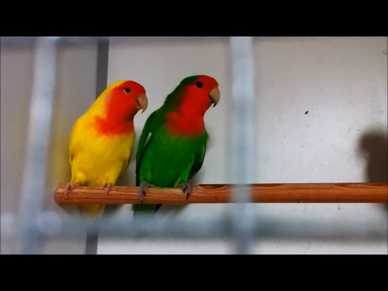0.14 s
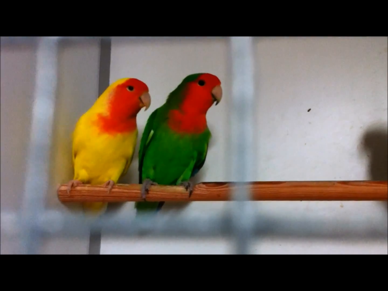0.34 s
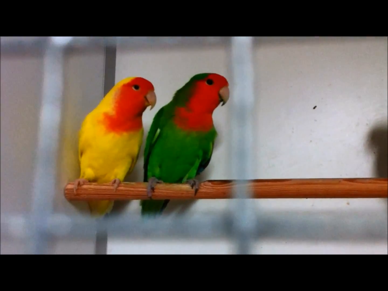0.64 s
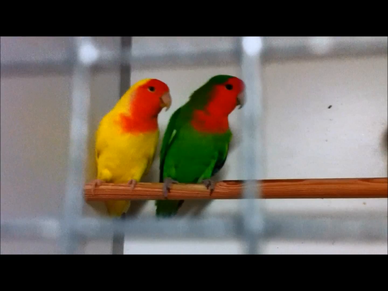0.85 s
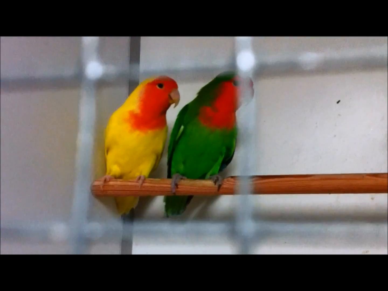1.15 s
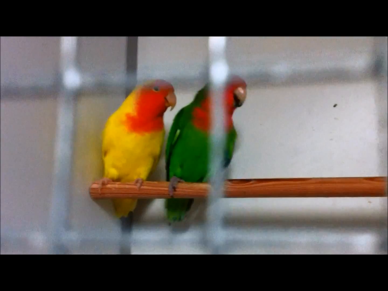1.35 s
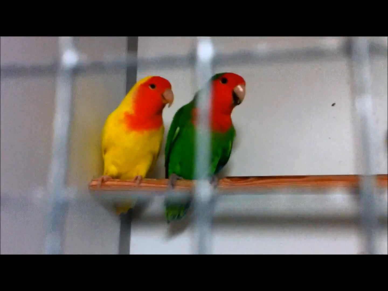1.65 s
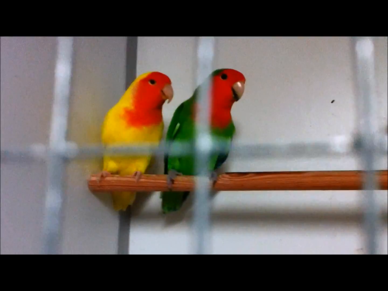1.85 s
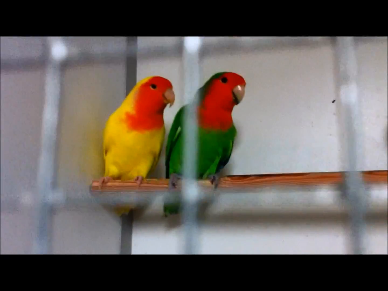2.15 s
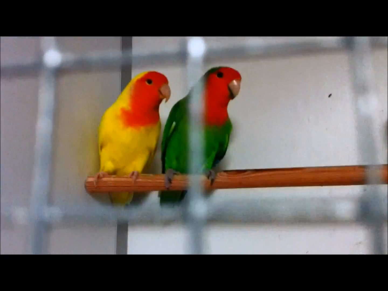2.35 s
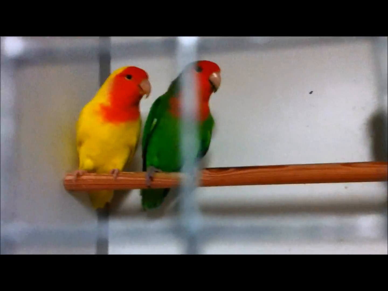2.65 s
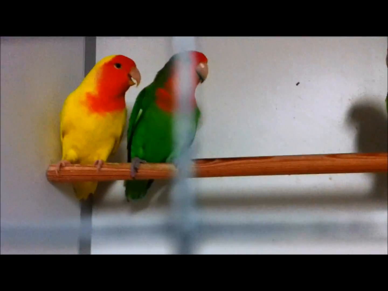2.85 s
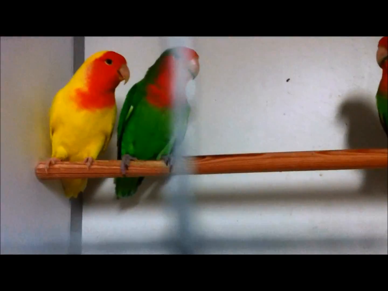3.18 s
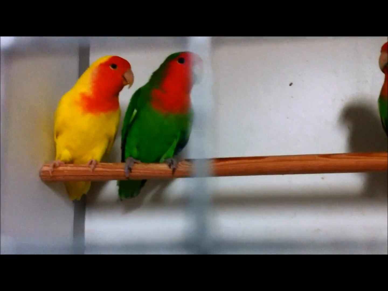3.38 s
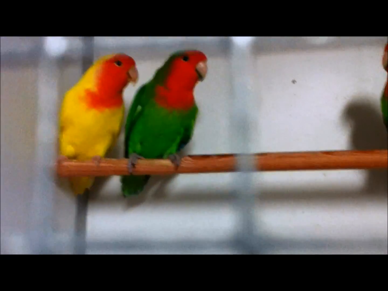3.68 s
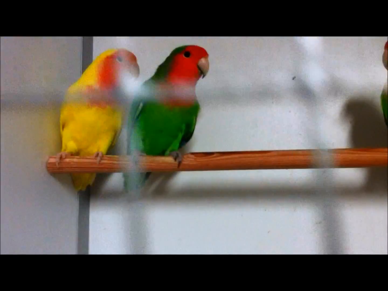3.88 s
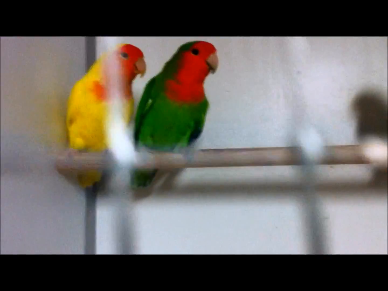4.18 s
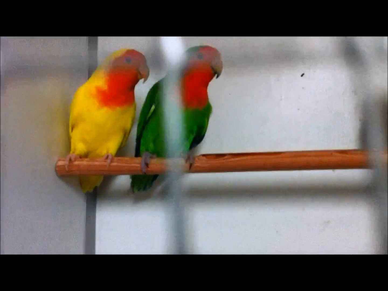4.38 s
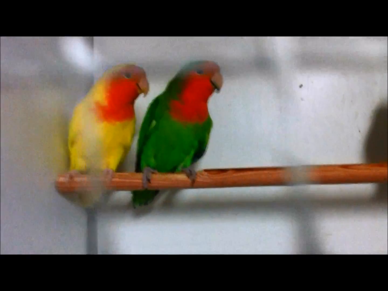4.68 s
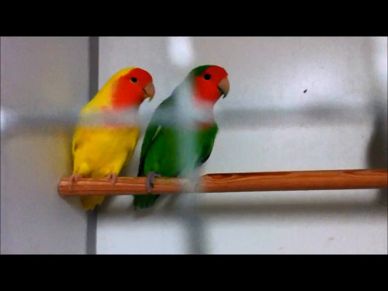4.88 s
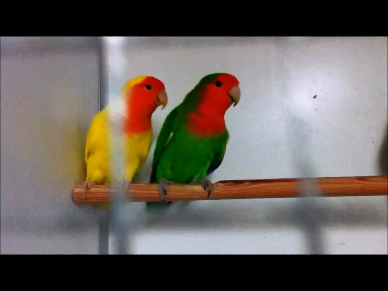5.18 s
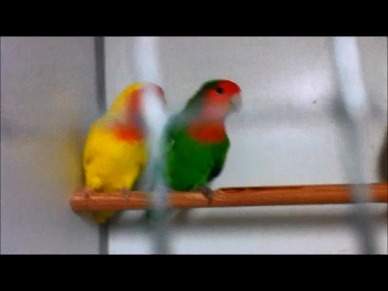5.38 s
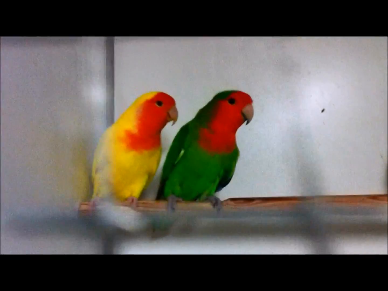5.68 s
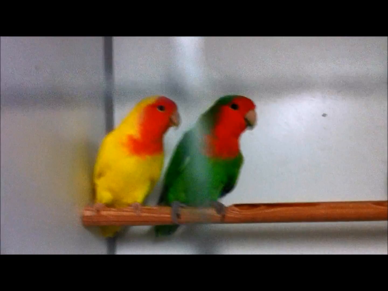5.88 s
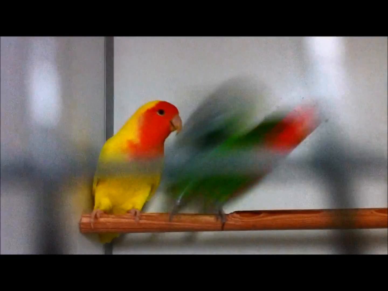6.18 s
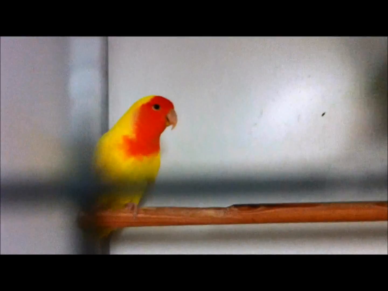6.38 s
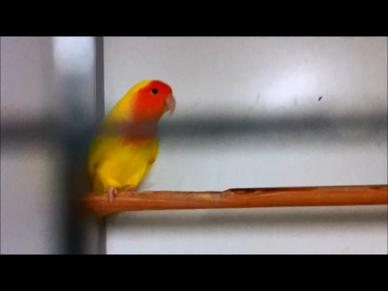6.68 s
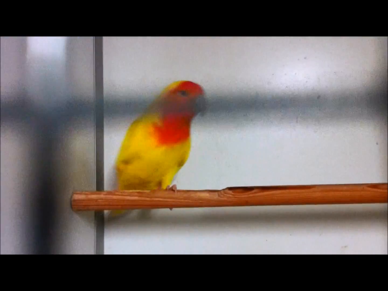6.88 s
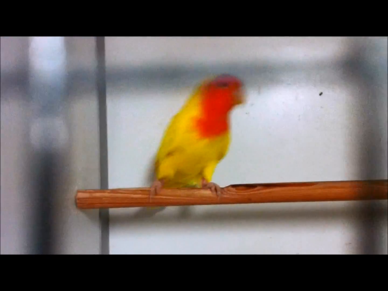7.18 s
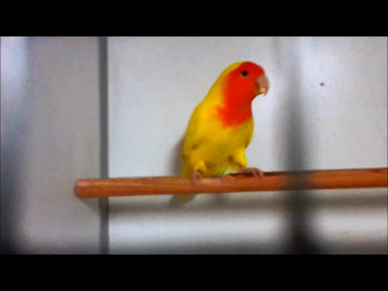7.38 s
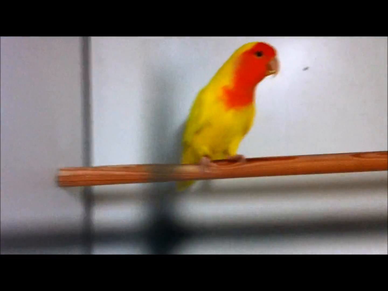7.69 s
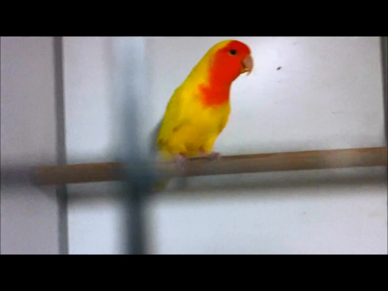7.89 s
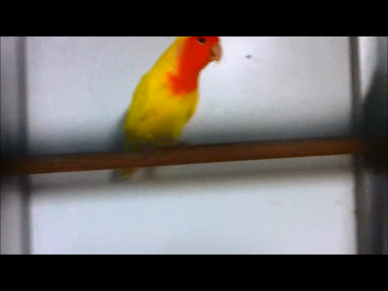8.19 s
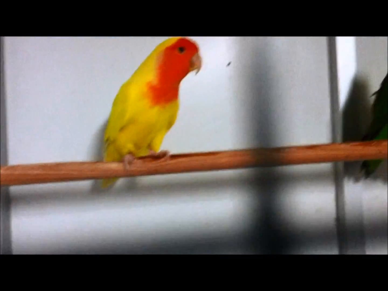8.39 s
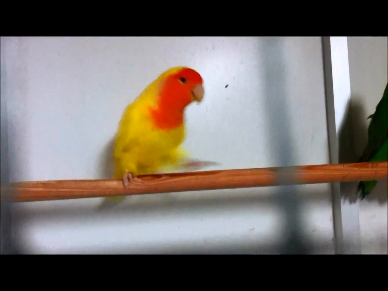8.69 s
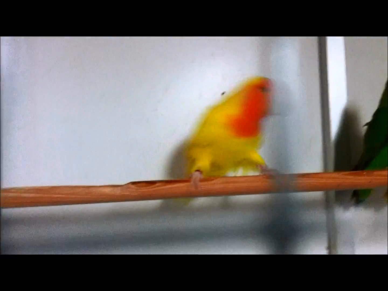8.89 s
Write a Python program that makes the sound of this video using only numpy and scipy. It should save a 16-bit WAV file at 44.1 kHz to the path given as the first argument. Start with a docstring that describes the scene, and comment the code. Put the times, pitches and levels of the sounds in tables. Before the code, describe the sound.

In a small, reflective indoor room, quiet murmur, thin hiss, a faint low hum and handling rumble surround caged lovebirds. The first second is nearly calm, with faint rustles and a tiny chip at 1.1. From 1.3 to 2.0, short shrill shrieks alternate between harsh rasp and clear rising whistle. A small close knock comes at 2.3, amid spaced rasping cries until 3.3, with a rattling scold around 3.0. Brief gliding shrieks follow to 3.9, then a louder, tighter burst from 4.4 to 4.9 ends in piercing whistles. Between 5.45 and 6.6, quick chips repeat about ten times a second; soft wing puffs flutter from 6.25 to 6.7. Strong shrieks and whistles ring at 6.7-6.9. Another rattling scold comes at 7.5, weak chips until 8.0, near quiet, then a bright high whistle at 8.95-9.05.

```python
"""Lovebirds in a small hard-walled room

Shrieks glide and break between clear whistle and harsh rasp, among rattling scolds and runs of short chips.
The calls come from a vibrating-membrane model: a harmonic series that smears and gives way to chaotic noise.
Scolds are pulse trains through beak resonances; wing beats are puffs of air; knocks are damped noise bursts.
Wall reflections and a decaying tail surround them, over murmur, hiss, handling rumble and a faint drone."""
import sys
import numpy as np
from scipy import signal
from scipy.fft import rfft, irfft, next_fast_len
from scipy.io import wavfile
from scipy.ndimage import uniform_filter1d, minimum_filter1d, map_coordinates

SR = 44100
rng = np.random.default_rng(int(sys.argv[2]) if len(sys.argv) > 2 else 0)


def dump_mix(stems):
    """Bounce the given channels to the path in sys.argv[1] as a 16-bit WAV at rate SR."""
    frames = np.atleast_2d(stems).T  # one column per channel
    limited = np.clip(frames, -1, 1)  # hard clip at full scale
    pcm = np.round(limited * 32767).astype(np.int16)
    wavfile.write(sys.argv[1], SR, pcm)


N = 398663
TIME = np.arange(N) / SR
CUTOFF_HZ = 15800

# Throat and beak filter of the clear voice in all shrieks and whistles: (frequency [Hz], gain [dB])
SHRIEK_THROAT = [(1600, -12), (2400, -11), (4000, 1.5), (5000, 2.5), (6500, -1), (7600, -8.5),
                 (9200, -10.5), (12500, -17.5), (15500, -37.5)]
SCOOP_S = 0.0065   # time constant of the onset of a gliding shriek


def from_db(db):
    """Level definition: an amplitude ratio is ten to the power dB / 20."""
    return 10 ** (np.asarray(db) / 20)


def rms_one(x):
    """Normalization of mean power to one."""
    return x / np.sqrt(np.mean(x ** 2) + 1e-20)


def at_hz(points, hz):
    """Interpolation of a spectrum on a logarithmic frequency axis."""
    points = np.array(points)
    return np.interp(np.log(np.maximum(hz, 1)), np.log(points[:, 0]), points[:, 1])


def in_time(rows):
    """Linear interpolation of a curve's columns at every sample."""
    s, *columns = np.transpose(rows)
    return [np.interp(TIME, s, column) for column in columns]


def controls(rows):
    """Linear interpolation of one call's columns from its first time to its last."""
    s, *columns = np.transpose(rows)
    s = np.sort(s)
    t = np.arange(s[0], s[-1] + 1 / SR, 1 / SR)
    return [np.interp(t, s, column) for column in columns]


def course(length_s):
    """Normalized time: seconds into a call, and progress through it from 0 to 1."""
    t = np.arange(int(length_s * SR)) / SR
    return t, t / length_s


def noise(spectrum, size):
    """Spectral shaping: white noise weighted in the frequency domain, at rms 1."""
    padded = next_fast_len(size)
    bins = rfft(rng.standard_normal(padded))
    hz = np.arange(len(bins)) * SR / padded
    shaped = irfft(bins * from_db(at_hz(spectrum, hz)), padded)
    return rms_one(shaped[:size])


def waver(rate_hz, size, count=1):
    """Low-pass random modulation of spread 1; several unrelated rows on request."""
    run_in = 2000   # samples for the filter to settle
    white = rng.standard_normal((count, size + run_in))
    lowpass = signal.butter(2, rate_hz, fs=SR, output="sos")
    smooth = rms_one(signal.sosfilt(lowpass, white))
    return np.squeeze(smooth[:, run_in:])


def band(x, low_hz, high_hz):
    """Causal band-pass filtering."""
    edges = [low_hz, min(high_hz, SR / 2 - 1)]
    return signal.sosfilt(signal.butter(2, edges, "band", fs=SR, output="sos"), x)


def add(track, s, sound, attack_s=0.0017, release_s=0.0031):
    """Superposition: a sound joins the track under a short linear attack and release."""
    t = np.arange(sound.shape[-1]) / SR
    envelope = np.minimum(1, np.minimum(t / attack_s, t[::-1] / release_s))
    sound = sound * envelope
    start = int(s * SR)
    track[..., start:start + len(t)] += sound[..., :max(N - start, 0)]


def aimed(sound, room_db, treble_db):
    """Directivity: a beak turned this way beams treble and seems thinner; returns direct sound and room send."""
    treble_hz, body_hz = 7200, 3440
    body_loss = 0.58   # body dB lost per dB of treble gained
    high = signal.butter(3, treble_hz, "high", fs=SR, output="sos")
    low = signal.butter(3, body_hz, fs=SR, output="sos")
    treble = signal.sosfiltfilt(high, sound)
    body = signal.sosfiltfilt(low, sound)
    treble_change = (from_db(treble_db) - 1) * treble
    body_change = (from_db(-body_loss * treble_db) - 1) * body
    sound = sound + treble_change + body_change
    return np.array([sound, from_db(room_db) * sound])


def murmur(level_db, lift_db=1.0):
    """Low-frequency broadband noise: a murmur that swells and sinks."""
    # Colour of the murmur: (frequency [Hz], relative level [dB])
    murmur_colour = [(40, -41), (90, -23.5), (140, -5), (200, -3), (300, -2), (600, -3.5), (1000, -9),
                     (1800, -14.5), (4000, -38)]
    return from_db(lift_db + level_db) * noise(murmur_colour, N)


def thin_hiss(swing_db):
    """High-frequency broadband noise, modulated in step with the murmur."""
    # Colour of the hiss: (frequency [Hz], relative level [dB])
    hiss_colour = [(700, -19), (1500, -2.5), (3000, -2), (6000, -5), (10000, -9), (15500, -20.5)]
    mean_db, follows = -61.5, 1   # follows: dB per dB of murmur swing
    return from_db(mean_db + follows * swing_db) * noise(hiss_colour, N)


def drone(swing_db):
    """Narrow-band noise: a faint low hum that partly follows the murmur."""
    hum_hz, width_hz, mean_db = 188, 42, -67
    follows = 0.54   # dB per dB of murmur swing
    hum = band(rng.standard_normal(N), hum_hz - width_hz / 2, hum_hz + width_hz / 2)
    return from_db(mean_db + follows * swing_db) * rms_one(hum)


def handling(lift_db=1.0):
    """Structure-borne rumble: low noise as the holding hand shifts."""
    # Rumble before the lift: (time [s], level [dB])
    rumble_level = [(0.08, -73.5), (1.05, -75), (1.1, -56.5), (1.65, -75.5), (2.22, -68.5), (2.32, -67.5),
                    (2.35, -66.5), (4.34, -62), (4.5, -73), (5.55, -66), (5.94, -78), (6.69, -56),
                    (6.74, -73), (7.91, -65), (8.29, -83.5), (8.59, -62.5), (8.99, -69.5), (9.04, -67.5)]
    # Colour of the rumble: (frequency [Hz], relative level [dB])
    rumble_colour = [(22, -24), (45, -17), (72, -1), (115, -1.5), (170, -12.5), (400, -30)]
    level_db, = in_time(rumble_level)
    return from_db(lift_db + level_db) * noise(rumble_colour, N)


def background():
    """Superposition of unrelated noises: murmur, hiss, handling rumble and drone."""
    # Murmur before its lift; its swing also drives hiss and drone: (time [s], level [dB])
    murmur_level = [(0.0, -62.5), (0.43, -72), (0.73, -63.5), (0.93, -58), (1.31, -51.5), (1.53, -61),
                    (1.94, -67), (2.72, -55), (3.25, -55.5), (3.95, -51), (4.91, -64), (5.31, -56.5),
                    (5.74, -56), (6.22, -60), (6.52, -45), (6.75, -61.5), (7.02, -62), (8.31, -61),
                    (8.53, -53.5), (9.04, -62)]
    level_db, = in_time(murmur_level)
    swing_db = level_db - level_db.mean()
    return murmur(level_db) + thin_hiss(swing_db) + handling() + drone(swing_db)


def knocks(push=2.5, hard_s=0.0027):
    """Damped contact: a brief one is mostly a single hard push, a long one a soft rustle."""
    # Small knocks and rustles, some close to the microphone, level before the paths sum:
    # (time [s], level [dB], pitch [Hz], decay time constant of the force [s])
    contacts = [(0.701, -60.5, 4900, 0.12), (0.76, -56, 597, 0.172), (0.821, -55.5, 6500, 0.044),
                (1.043, -50.5, 2400, 0.018), (1.199, -46, 1993, 0.0335), (2.3039, -28, 450, 0.00076),
                (2.474, -56, 1500, 0.054), (4.059, -55.5, 9160, 0.063), (4.226, -56.5, 6860, 0.065),
                (5.437, -52, 3440, 0.0226), (6.493, -43.5, 1230, 0.0069), (7.299, -55, 3520, 0.029),
                (7.353, -55, 2610, 0.017), (8.38, -58, 6940, 0.0495), (8.88, -51.5, 1516, 0.0055)]
    out, t = np.zeros(N), TIME[:SR // 5]
    for s, level_db, hz, decay in contacts:
        force = np.exp(-t / decay) * rng.standard_normal(len(t)) / np.sqrt(decay * SR)
        force[0] += push * np.exp(1 - decay / hard_s)
        sound = band(force, hz / 3, hz * 1.7)
        # the energy is set to that of a unit decay
        sound = sound * np.sqrt(decay * SR / 2 / np.sum(sound ** 2))
        add(out, s, from_db(level_db) * sound, attack_s=1 / SR)
    return out


def wings():
    """Aerodynamic noise: each wing beat pushes a soft puff of air with a Gaussian envelope."""
    # Wing beats: (time of the peak [s], level [dB], Gaussian half length [s])
    beats = [(6.269, -48, 0.0077), (6.349, -46.5, 0.0097), (6.481, -40, 0.0043), (6.524, -36.5, 0.0038),
             (6.678, -31, 0.0046), (6.7, -47.5, 0.0053)]
    # Colour of the moving air: (frequency [Hz], relative level [dB])
    air_colour = [(60, -27), (200, 1), (600, 1.5), (1200, -8), (3000, -15), (12000, -22.5)]
    puffs = sum(from_db(db) * np.exp(-.5 * ((TIME - s) / half) ** 2) for s, db, half in beats)
    return noise(air_colour, N) * puffs


def formant(x, hz, width_hz, skirt=3.1):
    """Resonance: two nested band-passes leave deep valleys on either side of a beak resonance."""
    half = min(width_hz / 2, hz / 3)
    reach = min(half * skirt, hz / 2)
    core = band(x, hz - half, hz + half)
    return band(core, hz - reach, hz + reach)


def scolds(unevenness=.06, closing=0.48, snap=6.5, squeal=0.25, squeal_jitter=0.0349):
    """Source and filter: uneven membrane slaps snap and puff through the beak resonances."""
    # Rattling scolds: (call rows, resonance rows); tuning scales pulse rates and resonances alike
    # call rows: (time [s], level [dB], pulse rate before tuning [1/s], tuning [ratio])
    # resonance rows: (frequency before tuning [Hz], width before tuning [Hz], relative level [dB])
    scold_calls = [ ([(2.932, -18, 250, 1.11), (2.948, -12.5, 205, 0.98), (2.98, -14.5, 260.7, 0.98),
                   (3.005, -14.5, 179, 1.015), (3.035, -15, 194, 0.99), (3.072, -11.5, 247, 1.07),
                   (3.088, -22, 220, 1.04)], [(1864, 344, -6), (3296, 420, -11), (3950, 310, -4.5),
                   (5450, 880, -1), (5950, 270, 1.5), (7600, 2300, -12), (9700, 400, -5),
                   (12130, 1820, -16.5)]), ([(7.465, -18, 152, 1.03), (7.478, -14.5, 153, 1.02),
                   (7.53, -15.5, 165, 0.98), (7.575, -18.5, 139, 0.88), (7.602, -14, 190, 1.04),
                   (7.622, -20.5, 100, 1.03)], [(1980, 510, -11), (3483, 260, -3), (4150, 834, -1),
                   (4924, 870, -3), (5910, 160, 4), (7186, 1650, -5.5), (9800, 680, -8.5),
                   (12300, 2900, -16.5)])]
    out = np.zeros(N)
    for call, resonances in scold_calls:
        level_db, per_s, tuning = controls(call)
        size = len(per_s)
        cycles = np.cumsum(per_s * (1 + unevenness * waver(200, size))) / SR
        snaps = np.diff(np.floor(cycles), prepend=-1)
        opening = np.exp(-closing * (cycles % 1))
        drive = snap * snaps + opening * rng.standard_normal(size)
        voice = sum(from_db(db) * formant(drive, hz, width) for hz, width, db in resonances)
        # a rough squeal locks on to the second resonance
        squeal_hz = resonances[1][0] * (1 + squeal_jitter * waver(510, size))
        squeal_tone = opening * np.sin(2 * np.pi * np.cumsum(squeal_hz) / SR)
        voice = rms_one(voice) + squeal * rms_one(squeal_tone)
        # as the beak closes and opens, resonances and pulses slide together
        voice = map_coordinates(voice, [np.cumsum(tuning)], order=3, mode="mirror")
        add(out, call[0][0], from_db(level_db) * rms_one(voice), attack_s=0.0035)
    return out


def chaos(pitch, slide=.7, wander=.045, wander_hz=70, tear=0.41, tear_hz=160):
    """Deterministic chaos imitated by noise: resonances ride on the pitch while each band swells on its own."""
    # Rasp colour at the reference pitch: (frequency [Hz], relative density [dB per Hz])
    rasp_colour = [(1000, -59), (1900, -52.5), (2500, -18), (2950, -2.5), (3500, -3), (4100, -1),
                   (4800, -3), (5400, 0), (6200, 3), (7000, -9), (8300, -5), (9800, -10.5), (12500, -14.5),
                   (15500, -40)]
    reference_hz = 2464
    size = len(pitch)
    speed = (pitch / reference_hz) ** slide * np.exp(wander * waver(wander_hz, size))
    torn = map_coordinates(noise(rasp_colour, 2 * size), [np.cumsum(speed)], order=3, mode="mirror")
    edges = np.geomspace(1500, 17000, 9)
    swells = np.exp(tear * waver(tear_hz, size, count=len(edges) - 1))
    total = 0
    for k, (low, high) in enumerate(zip(edges, edges[1:])):
        # neighbouring bands have opposite sign
        total = total + band(torn, low, high) * swells[k] * (-1) ** k
    return rms_one(total)


def syrinx(pitch, rasp, whistle, doubling, throat, jitter=0.0084, rasp_jitter=.075, jitter_hz=600,
           chaos_power=2.31, flutter=0.05, flutter_hz=300, shimmer=0.6):
    """Nonlinear vibration: as rasp grows, the membrane's harmonics smear into bands, then yield to chaos."""
    size, rasp = len(pitch), np.clip(rasp, 0, 1)
    unsteadiness = (jitter + rasp_jitter * rasp ** 0.45) * waver(jitter_hz, size)
    phase = 2 * np.pi * np.cumsum(pitch * (1 + unsteadiness)) / SR
    multiple = np.arange(1, 17)[:, None] / 2
    # period doubling adds lines between the harmonics; a whistle keeps only the even ones
    odd_weight = (1 - np.clip(whistle, 0, 1)) ** 1.6 + from_db(-70.5)
    weight = np.where(multiple % 1 > 0, doubling, np.where(multiple % 2 > 0, odd_weight, 1))
    line_hz = multiple * pitch
    weight = weight * from_db(at_hz(throat, line_hz)) * (line_hz < CUTOFF_HZ)
    weight = weight * np.exp(shimmer * waver(58, size, count=len(multiple)))
    tone = (weight * np.sin(multiple * phase)).sum(0) / np.sqrt((weight ** 2).sum(0) / 2)
    share = rasp ** chaos_power   # chaotic part of the power
    throb = rms_one(np.exp(flutter * np.sqrt(rasp) * waver(flutter_hz, size)))
    return throb * (np.sqrt(1 - share) * tone + np.sqrt(share) * chaos(pitch))


def chips(arch=.1, fade_db=5, room_db=7, doubling_per_s=12):
    """Frequency modulation: the pitch of very short calls arches up and over while the push fades."""
    # Chips, level at mid-call before the beak's directivity:
    # (time [s], mean pitch [Hz], level [dB], length [s], rasp [0-1], treble gain [dB])
    chip_calls = [(1.075, 2108, -29, 0.012, 0.47, 3), (2.221, 2480, -36.5, 0.01, 0.4, -8),
                  (5.459, 1875, -26, 0.011, 0.08, 1), (5.556, 1870, -26, 0.01, 0.3, -0.5),
                  (5.651, 1910, -26, 0.0085, 0.18, -4), (5.752, 1984, -26, 0.0091, 0.1, -3),
                  (5.855, 1850, -23.5, 0.011, 0.28, -4.5), (5.939, 2270, -24, 0.0097, 0.57, -1),
                  (6.032, 2150, -21, 0.012, 0.32, 3), (6.043, 2345, -29.5, 0.019, 1, 4),
                  (6.113, 2103, -26.5, 0.021, 0.73, 2.5), (6.203, 1977, -22.5, 0.011, 0.18, 0),
                  (6.287, 2244, -20.5, 0.011, 0.12, 3.5), (6.368, 2575, -19, 0.011, 0.06, 1.5),
                  (6.455, 2277, -31, 0.012, 0, -1), (6.536, 2360, -31, 0.013, 0.09, 1.5),
                  (6.613, 2260, -26, 0.0095, 0, 1.5), (7.384, 2246, -36, 0.035, 0.55, -1),
                  (7.718, 2280, -32.5, 0.031, 0.4, -2), (7.808, 2352, -30, 0.022, 0.6, -1),
                  (7.89, 2173, -30.5, 0.01864, 0.32, 0.5), (7.975, 2235, -30.5, 0.021, 0.43, -0.5)]
    # Throat and beak filter of the clear voice in chips: (frequency [Hz], gain [dB])
    chip_throat = [(1000, -13), (2100, -10.5), (3300, 2), (4300, -2.5), (6500, 0.5), (8000, -7.5),
                   (10000, -12), (12500, -16), (15500, -39)]
    out = np.zeros((2, N))
    for s, mean_hz, level_db, length, rasp, treble_db in chip_calls:
        t, progress = course(length)
        bow = np.sin(np.pi * np.sqrt(progress))
        pitch = mean_hz * (1 + arch * (bow - bow.mean()))
        # the longer a chip, the more its period doubles
        voice = syrinx(pitch, rasp, 0, doubling_per_s * length, chip_throat)
        voice = from_db(level_db - fade_db * (progress - .5)) * voice
        add(out, s, aimed(voice, room_db, treble_db))
    return out


def whistles():
    """Register change: piercing notes on a straight glide, many led by the even harmonics."""
    # Whistles, mostly where a shriek flips register, level before the beak's directivity:
    # (time [s], length [s], pitch from [Hz], pitch to [Hz], level [dB], rasp [0-1],
    #  whistle: loss of odd harmonics [0-1], room send [dB], treble gain [dB])
    whistle_calls = [(1.503, 0.011, 2550, 3044, -9, 0.2, 0.74, -14.5, -2.5),
                     (1.797, 0.008, 2580, 2800, -10, 0.7, 0.6, -7, -2),
                     (4.752, 0.021, 3230, 3010, -9.5, 0, 0.06, -2.5, -7),
                     (4.777, 0.029, 2017, 1972, -11, 0.01, 0.95, 4, -4),
                     (4.799, 0.036, 3086, 2954, -15.5, 0.35, 0.4, -4, -4.5),
                     (4.829, 0.03, 1887, 1842, -14.5, 0.07, 1, -1, -2),
                     (4.861, 0.017, 1944, 2040, -8.5, 0.02, 1, -2.5, -4),
                     (5.789, 0.011, 2680, 2890, -22, 0.04, 0.64, 1, 4),
                     (5.799, 0.0044, 3050, 3280, -23, 0.03, 0.56, 12, 3),
                     (5.844, 0.008, 2610, 2200, -30, 0.6, 0.7, -4, 10),
                     (5.98, 0.012, 2330, 2278, -26.5, 0.08, 0.7, 3, 9.5),
                     (6.692, 0.0089, 2660, 2700, -23.5, 0.3, 1, -2.5, -24),
                     (6.729, 0.013, 2980, 3300, -4, 0.34, 0.94, -6, -4),
                     (6.870, 0.03, 3226, 3219, -12.5, 0, 1, -3, -0.5),
                     (8.961, 0.052, 3030, 3183, -12.5, 0.01, 1, 1, 2),
                     (9.007, 0.040, 3150, 3120, -5, 0.002, 1, -8, -9)]
    out = np.zeros((2, N))
    for s, length, from_hz, to_hz, level_db, rasp, whistle, room_db, treble_db in whistle_calls:
        t, progress = course(length)
        pitch = from_hz + (to_hz - from_hz) * progress
        voice = from_db(level_db) * syrinx(pitch, rasp, whistle, 0, SHRIEK_THROAT)
        add(out, s, aimed(voice, room_db, treble_db), attack_s=0.0018, release_s=0.0037)
    return out


def sweeps():
    """Pressure-driven pitch: a gliding shriek scoops up as the air pressure builds, then glides on."""
    # Gliding shrieks, most rising; pitch, level and whistle before the onset, level at mid-call
    # before the beak's directivity; "rasp from" dies away while "rasp to" grows:
    # (time [s], length [s], pitch from [Hz], pitch to [Hz], level [dB], swell over the call [dB],
    #  rasp from [0-1], rasp to [0-1], whistle: loss of odd harmonics [0-1], room send [dB], treble gain [dB])
    sweep_calls = [(1.465, 0.045, 2002, 2210, -11, 8, 0.4, 0.01, 0.93, -10, 3.5),
                   (1.593, 0.072, 2226, 2343, -15.5, -3, 0.32, 0.84, 0.26, 4.5, 3),
                   (1.743, 0.065, 2175, 2470, -12, 6.5, 0.05, 0, 0.07, -3.5, -1.5),
                   (3.36, 0.044, 2480, 2643, -18, 11.5, 0.63, 0.18, 0, 6.5, -2),
                   (3.535, 0.04, 2638, 2605, -16.5, 8.5, 0.97, 0.04, 0, 7, -1.5),
                   (3.74, 0.051, 2712, 2698, -20.5, 3.5, 0.63, 0.07, 0, 6.5, -4),
                   (3.895, 0.021, 2897, 2722, -24, -1, 0.03, 0.01, 0, 10.5, -8),
                   (4.405, 0.036, 1992, 2453, -5.5, 1.5, 0.1, 0, 0.83, -5, 5),
                   (4.493, 0.036, 2149, 2377, -13, 3.5, 0.89, 0.51, 0.45, -9.5, 2),
                   (4.592, 0.035, 2540, 2300, -11.5, -3.5, 0.06, 0.28, 0.7, -1, 3),
                   (4.721, 0.034, 2492, 2500, -8, 10, 0.6, 0, 0.42, -2.5, -3),
                   (5.913, 0.018, 2353, 2685, -24.5, 2, 0.4, 0.08, 0.59, -2, 12),
                   (6.123, 0.012, 2186, 2370, -29, -5, 0.15, 0.1, 0.9, -2, 11),
                   (6.699, 0.032, 2273, 2300, -9, -6, 0.5, 0.46, 0.05, -5, 2),
                   (6.836, 0.034, 2291, 2430, -11.5, 2.5, 0.33, 0.86, 0.35, -5.5, 1),
                   (8.951, 0.014, 2738, 2184, -8, -11, 0.15, 0.24, 0.9, -5.5, 0)]
    scoop_share, softer_db, reedy_start = 0.18, 2, 0.45   # drops at the very onset
    settle_s, roughen_power = 0.012, 1.6
    out = np.zeros((2, N))
    for (s, length, from_hz, to_hz, level_db, swell_db, rasp_from, rasp_to,
         whistle, room_db, treble_db) in sweep_calls:
        t, progress = course(length)
        onset = np.exp(-t / SCOOP_S)
        pitch = (from_hz + (to_hz - from_hz) * progress) * (1 - scoop_share * onset)
        rasp = rasp_from * np.exp(-t / settle_s) + rasp_to * progress ** roughen_power
        voice = syrinx(pitch, rasp, whistle * (1 - reedy_start * onset), 0, SHRIEK_THROAT)
        voice = from_db(level_db + swell_db * (progress - .5) - softer_db * onset) * voice
        add(out, s, aimed(voice, room_db, treble_db), attack_s=0.0041, release_s=0.006)
    return out


def rasps():
    """Transition to chaos: a softer, voiced start breaks into rasp within moments."""
    # Harsh shrieks; rasp and level before the voiced start, level at mid-call before the beak's directivity:
    # (time [s], length [s], pitch [Hz], level [dB], fade over the call [dB], rasp [0-1],
    #  whistle: loss of odd harmonics [0-1], room send [dB], treble gain [dB])
    rasp_calls = [(1.301, 0.089, 2558, -14, 9, 0.73, 0.57, 2.5, 3.5),
                  (1.951, 0.086, 2560, -18.5, 7.5, 0.94, 0.41, 6.5, 2),
                  (2.244, 0.069, 2393, -15, 1.5, 0.96, 0.8, 4.5, 4),
                  (2.514, 0.069, 2610, -21.5, -2, 1, 0.22, 3, -5.5),
                  (2.817, 0.105, 2490, -16.5, 7.5, 0.91, 0.4, 5, 0.5),
                  (3.239, 0.104, 2470, -15.5, -0.5, 1, 0.02, 5.5, -2),
                  (4.523, 0.079, 2385, -18.5, 3.5, 0.91, 0.12, 0, -3)]
    voiced_start, softer_db, break_s = 0.8, 4, 0.0094
    out = np.zeros((2, N))
    for s, length, pitch, level_db, fade_db, rasp, whistle, room_db, treble_db in rasp_calls:
        t, progress = course(length)
        voiced = np.exp(-t / break_s)
        steady_pitch = np.full(len(t), pitch)
        voice = syrinx(steady_pitch, rasp * (1 - voiced_start * voiced), whistle, 0, SHRIEK_THROAT)
        voice = from_db(level_db - softer_db * voiced - fade_db * (progress - .5)) * voice
        add(out, s, aimed(voice, room_db, treble_db), attack_s=0.0064, release_s=0.0034)
    return out


def room(direct, sent, treble_loss_db=-1.0):
    """Reverberation: direct sound, early wall reflections, and a diffuse tail whose treble dies first."""
    # Reflections from hard walls close by: (delay [s], gain [ratio])
    walls = [(.00062, 0.03), (.0013, 0.04), (.0021, 0.036), (.0034, 0.061), (.0047, 0.33), (.0083, 0.15),
             (0.0133, 0.16)]
    # Reverberation time of the tail: (frequency [Hz], time to fall 60 dB [s])
    room_t60 = [(500, 0.63), (2000, 0.29), (4000, 0.28), (7000, 0.25), (10000, 0.2), (15000, .2)]
    tail_db, build_s = -5.5, 0.0015   # tail level is relative to an energy of one half
    t, edges = TIME[:SR // 2], np.geomspace(150, 18000, 13)
    tail = 0
    for low, high in zip(edges, edges[1:]):
        hz = np.sqrt(low * high)
        decay = np.exp(-np.log(1000) * t / at_hz(room_t60, hz))
        loss = from_db(treble_loss_db * (hz / 10000) ** 2)
        tail = tail + band(rng.standard_normal(len(t)), low, high) * decay * loss
    tail = tail * (1 - np.exp(-t / build_s))
    tail = from_db(tail_db) * tail / np.sqrt(2 * np.sum(tail ** 2))
    slaps = sum(gain * np.pad(direct, (int(delay * SR), 0))[:N] for delay, gain in walls)
    return direct + slaps + signal.fftconvolve(sent, tail)[:N]


def scene(knock_room=0.94):
    """Linear superposition: birds, wings and knocks in the room, over the background."""
    near = knocks()
    scolding = aimed(scolds(), room_db=-3, treble_db=-2.5)
    birds = scolding + chips() + whistles() + sweeps() + rasps()
    fluttering = aimed(wings(), room_db=-0.5, treble_db=0)
    # the knocks hardly stir the tail; a dry copy joins after the room
    knocking = aimed(knock_room * near, room_db=-8, treble_db=0)
    direct, sent = birds + fluttering + knocking
    return (room(direct, sent) + near + background())[None]


def record(dry):
    """Peak limiting and low-pass filtering: a fast limiter holds the loudest peaks, then the top is cut."""
    window = 177   # samples, about 4 ms
    gain = minimum_filter1d(1 / np.maximum(np.abs(dry) / .92, 1), size=window)
    limited = dry * uniform_filter1d(gain, size=window)
    return signal.sosfilt(signal.ellip(12, .1, 80, CUTOFF_HZ, fs=SR, output="sos"), limited)


dry = scene()
out = record(dry)
dump_mix(out)
```